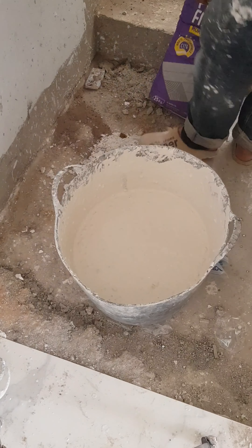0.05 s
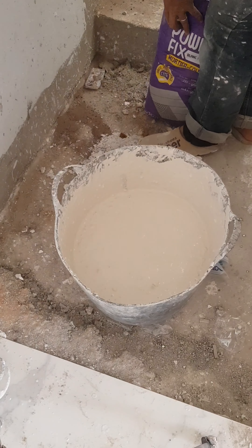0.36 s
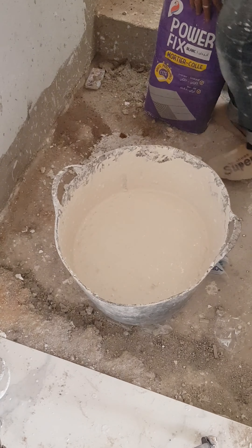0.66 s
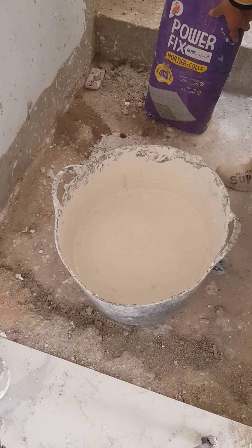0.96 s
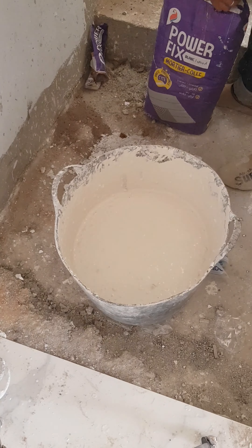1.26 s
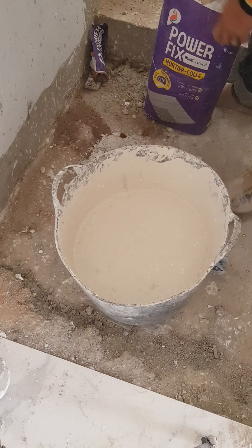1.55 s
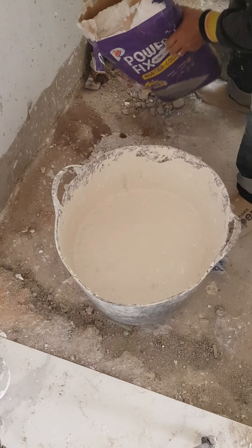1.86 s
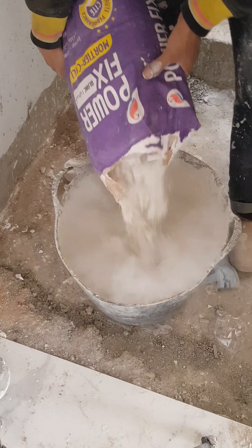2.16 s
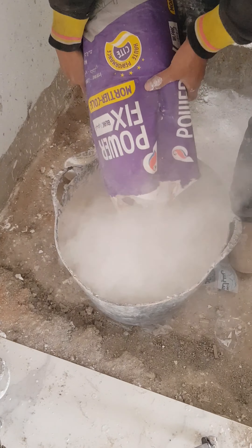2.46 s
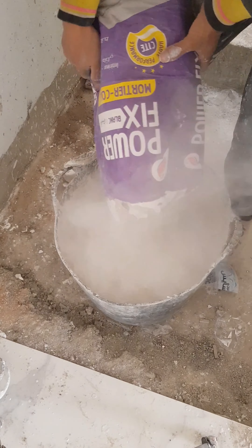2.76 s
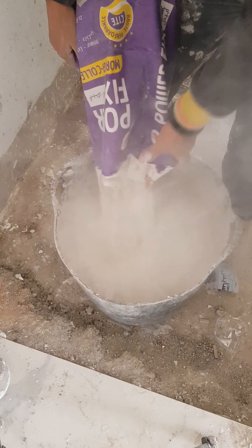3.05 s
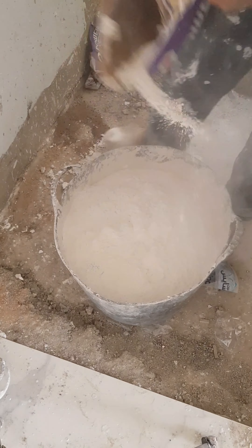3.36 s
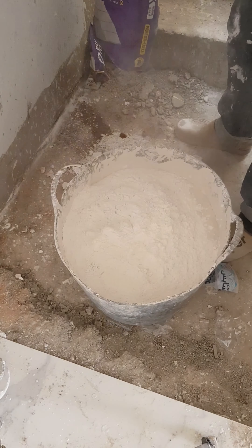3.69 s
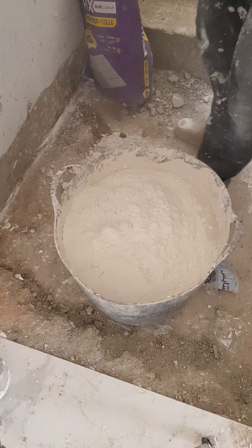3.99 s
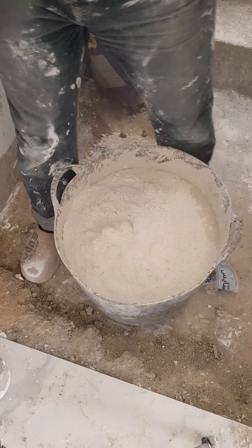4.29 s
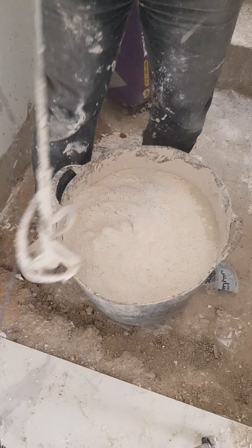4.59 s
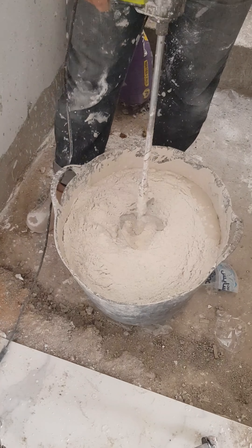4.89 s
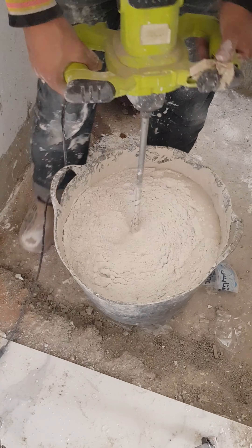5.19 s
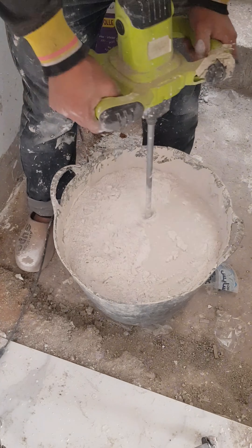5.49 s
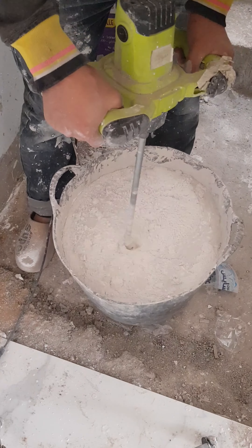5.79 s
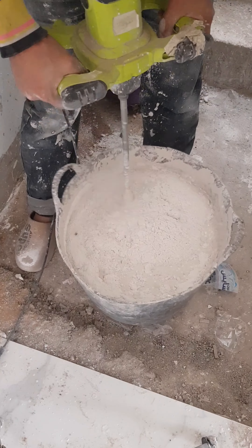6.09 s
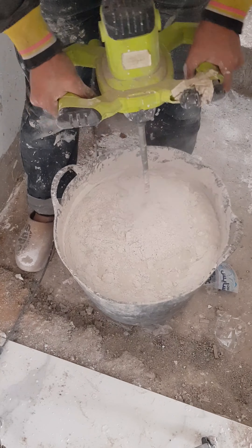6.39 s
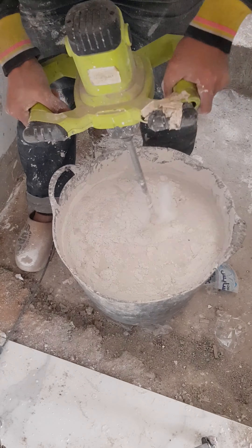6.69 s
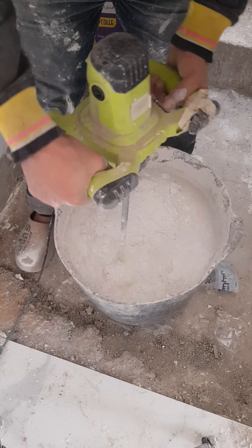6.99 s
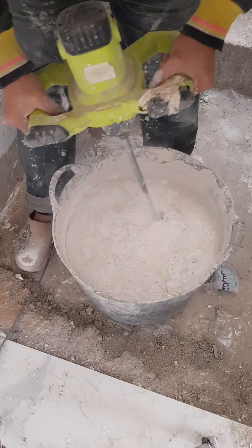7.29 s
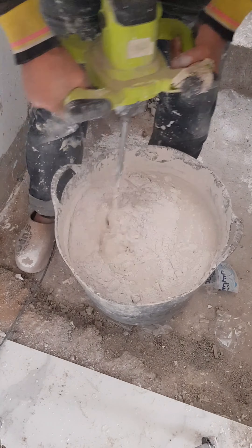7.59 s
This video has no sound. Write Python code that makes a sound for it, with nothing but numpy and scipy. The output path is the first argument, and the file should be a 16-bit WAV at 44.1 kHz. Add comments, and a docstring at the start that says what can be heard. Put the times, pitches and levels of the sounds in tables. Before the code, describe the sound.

Close by in a bare, slightly echoing room, someone handles a sack, with uneven rustling, crisp snaps, shuffling steps and a few dull bumps. This quietens, a switch clicks faintly, and a handheld electric mixer starts about five seconds in. It runs to the end with a loud, wavering gear whine and a rushing fan, over the low churn of mortar in a plastic tub.

```python
"""First comes the rustle of a sack and work clothes, rubbing and crinkling, with shuffling feet and soft
knocks on the floor and a plastic tub of mortar. After about five seconds a trigger clicks and a paddle
mixer spins up. Its gear teeth whine and rattle, and the pitch sags whenever the paddle bites.
The cooling fan rushes and the mortar churns against the tub. The bare room adds a short echo."""
import sys
import numpy as np
from scipy import signal
from scipy.fft import rfft, irfft, next_fast_len
from scipy.io import wavfile

SR = 44100
rng = np.random.default_rng(int(sys.argv[2]) if len(sys.argv) > 2 else 0)


def unload_wav(signal):
    """Save mono or channel-first audio to the path in sys.argv[1] as 16-bit WAV at rate SR, clipped to [-1, 1]."""
    wavfile.write(
        sys.argv[1],
        SR,
        np.round(np.clip(np.atleast_2d(signal).T, -1, 1) * 32767).astype(np.int16),
    )


N = 346179
TIME = np.arange(N) / SR
STEPS = TIME[::32]   # coarser times, for slow changes

# how fast the gear teeth meet, sagging when the paddle bites: (time [s], tooth rate [Hz])
TOOTH_RATE = [(5.27, 1254), (5.3, 1265), (5.33, 1727), (5.38, 1930), (5.43, 2103), (5.51, 2068),
              (5.66, 1757), (5.78, 2083), (6.01, 1843), (6.25, 1790), (6.33, 1697), (6.55, 1950),
              (6.88, 1766), (6.93, 1857), (7.03, 1890), (7.16, 1586), (7.23, 1733), (7.38, 1706),
              (7.6, 1858), (7.67, 1794), (7.83, 1895), (7.85, 1864)]
# the tones in the whine: (multiple of the tooth rate, level [dB])
WHINE_TONES = [(.25, -8.5), (0.678, -8.5), (1, 0), (2, 0), (3, -15), (4, -10.5), (5, -11), (6, -10),
               (6.999, -12), (8, -9)]
# how hard the teeth press, heard in the lower tones: (time [s], level [dB])
TOOTH_LOAD = [(5.27, -3.5), (5.35, 0.5), (5.5, 3.5), (5.68, -2), (5.85, 1.5), (6.05, 1), (6.3, 3.5),
              (6.37, -0.5), (6.46, 4.5), (6.97, -1.5), (7.05, 4), (7.13, 3), (7.85, -1.5)]
# how much the gears rasp, heard in the overtones: (time [s], level [dB])
RASP = [(5.4, 0), (5.9, 0), (6.2, 1), (6.55, 2), (6.95, -0.5), (7.15, -1.5), (7.25, 0.5), (7.55, -2.5),
        (7.73, 3)]
# the housing lets some pitches out better than others: (frequency [Hz], level [dB])
HOUSING = [(1120, -1), (1260, 3.5), (1400, -4), (1830, 0.5), (3200, -2), (3850, 1), (4200, 0.5),
           (5600, 5.5), (7400, 2), (8500, -1), (9500, 4), (10300, 0.5), (12000, -1.5), (13400, 7),
           (14300, -9)]
# where the gear case rings: (frequency [Hz], width [Hz], level [dB])
CASE_RINGS = [(1213, 220, 5.5), (1740, 860, -15), (2600, 190, -16), (3670, 570, -5)]
# the case squeals as the motor takes up slack: (time [s], level [dB], pitch [Hz], fade time [s])
SQUEALS = [(5.272, -34, 2490, 0.12), (5.295, -14, 2654, 0.056)]
# the mixer leans towards the listener and away: (time [s], level [dB])
NEARNESS = [(5.3, .5), (5.45, -0.1), (5.7, -1), (6.1, 0), (6.55, 0.2), (6.95, 0), (7.25, 0.6), (7.55, 0),
            (7.8, 0.9)]
# the trigger's click: (time [s], level [dB])
TRIGGER = [(5.1578, -26)]
# tone colours of the gear rattle, fan and mortar: (frequency [Hz], level [dB])
RATTLE_COLOUR = [(500, -22), (800, -3.5), (1100, -3), (1480, -6.5), (2200, -4.5), (3000, -2.5), (4000, -8),
                 (5000, -10)]
FAN_COLOUR = [(4000, 6), (5600, 1.5), (6500, -1), (7200, -0.5), (8100, -5), (9600, -1.5), (12000, -3),
              (13300, -1.5), (16000, -7.5)]
MORTAR_COLOUR = [(25, -13), (50, -11.5), (73, 2), (100, -4.5), (170, -8), (260, -6.5), (340, -0.5),
                 (450, 0.5), (560, -3.5), (800, -4.5)]

# light rubbing as the worker moves between strokes: (time [s], level [dB])
FIDGETING = [(0, -49.5), (.7, -51.5), (1.02, -61.5), (1.25, -53), (1.63, -59), (2.1, -48), (2.62, -49.5),
             (3.05, -44.5), (3.75, -47.5), (4.18, -73.5), (4.45, -59.5), (4.75, -63.5), (4.85, -70),
             (5.0, -69), (5.24, -63.5)]
# strokes of sack and clothes: (time [s], rise time [s], fade time [s], rub [dB], crinkle [dB])
STROKES = [(0.0, 0.027, 0.62, -46, -45.5), (.29, 0.01, 0.22, -45, -47), (0.383, 0.042, 0.59, -36.5, -32),
           (0.429, 0.033, 0.84, -34.5, -39.5), (.52, 0.031, 0.33, -40.5, -57),
           (0.789, 0.078, 0.088, -38.5, -38.5), (.74, 0.032, 0.2, -43.5, -50),
           (.935, 0.02, 0.093, -51, -47), (1.053, 0.017, 0.32, -43, -46), (1.12, 0.034, 0.58, -43.5, -44),
           (1.29, 0.048, 0.28, -43.5, -42.5), (1.402, 0.02, 0.15, -31, -33),
           (1.52, 0.021, 0.11, -47.5, -50), (1.895, 0.028, 0.9, -45, -51.5),
           (1.69, 0.014, 0.36, -48, -46.5), (1.78, 0.047, 0.09, -47.5, -46),
           (2.02, 0.066, 0.9, -39.5, -44.5), (2.2, 0.071, 0.12, -41.5, -44), (2.36, 0.057, .17, -34, -38.5),
           (2.71, 0.01, 0.18, -49, -57), (2.9, 0.11, 1, -37.5, -40.5), (3.06, 0.029, 0.405, -38, -47),
           (3.24, .08, 0.21, -37.5, -42), (3.41, 0.035, 0.086, -43, -41.5),
           (3.53, 0.077, 0.091, -44.5, -48), (3.655, 0.086, 0.454, -41, -46),
           (3.756, 0.024, 0.22, -33, -38), (4.007, 0.023, 0.27, -51, -62),
           (4.308, 0.015, 0.081, -40.5, -48), (4.378, 0.015, 0.17, -52, -49.5),
           (4.49, 0.027, 0.26, -51, -78), (4.7, 0.048, 0.14, -60, -64), (4.93, .02, 0.17, -51.5, -60),
           (5.04, 0.024, 0.21, -53, -58)]
# feet shuffle and the sack is dumped: (time [s], level [dB], fade time [s])
SHUFFLES = [(0.0, -42.5, 0.57), (.83, -46, 0.74), (1.23, -50, .8), (1.42, -47, 0.64), (1.55, -42, 0.32),
            (1.81, -47, .3), (1.93, -42.5, 0.94), (2.11, -36.5, 1.2), (2.39, -35.5, 0.45),
            (2.52, -41.5, 0.53), (2.7, -42, 2), (2.96, -37.5, 1.6), (3.29, -39, 0.91), (3.76, -37, 0.72),
            (4.39, -40.5, 0.49), (4.63, -49, .12), (4.705, -46.5, 0.42), (4.88, -46.5, 0.4),
            (4.99, -50.5, .35), (5.16, -64, 0.99), (5.25, -44, 0.55)]
# sack, boots and paddle bump floor and tub: (time [s], level [dB], pitch [Hz], fade time [s])
KNOCKS = [(0.651, -27, 514, 0.026), (1.066, -43, 830, 0.06), (1.413, -33, 940, 0.23),
          (1.443, -30, 190, 0.12), (1.945, -28, 140, 0.069), (2.131, -15.5, 126, 0.035),
          (2.16, -30, 72, 0.74), (2.415, -24, 275, 0.068), (2.682, -34, 596, 0.06),
          (2.807, -35, 540, 0.046), (2.978, -12.5, 584, 0.016), (3.085, -26, 1130, 0.062),
          (3.312, -28, 507, 0.077), (3.441, -31, 605, 0.047), (3.778, -22.5, 468, 0.13),
          (3.785, -27.5, 240, 0.15), (3.795, -33, 79, 0.55), (4.407, -29.5, 243, 0.14),
          (4.648, -29, 520, 0.032), (4.903, -34, 673, 0.042)]
# creases snap and grit ticks: (time [s], level [dB])
SNAPS = [(0.0772, -27.5), (0.3012, -34.5), (0.393, -37), (1.0655, -46), (1.3094, -32), (1.3743, -29),
         (1.4147, -22), (1.696, -35.5), (1.8108, -33.5), (1.9021, -32), (2.1261, -26.5), (2.218, -42),
         (2.2458, -34), (2.4164, -24), (2.6818, -33), (2.8065, -32.5), (2.9776, -24), (3.1911, -29.5),
         (3.3717, -31), (3.4401, -31), (3.5872, -31), (5.0968, -36)]
# tone colours of the sack's dull rub and crisp crinkle: (frequency [Hz], level [dB])
SACK_COLOUR = [(35, -12), (72, -2), (100, -5.5), (140, -2.5), (200, -7.5), (280, -8.5), (450, -4.5),
               (650, -5.5), (900, -8), (1300, -8.5), (1900, -12), (2600, -15)]
CRINKLE_COLOUR = [(1180, -33), (2000, 0.5), (4340, -4), (7910, -8.5), (10100, -8.5), (12100, -4.5),
                  (15100, -8.5), (16000, -9)]
# tone colours of the room's reflections and faint rumble: (frequency [Hz], level [dB])
ROOM_COLOUR = [(60, 17), (250, -2.5), (1000, 0), (3000, 9.5), (14000, 6)]
RUMBLE_COLOUR = [(30, 13), (70, 21), (200, 7), (500, -15), (1500, -38), (4000, -30), (16000, -46)]

CUTOFF_HZ = 15900


def gear_whine(level_db=1.5):
    """Meeting teeth sing. Play between them and an off-centre wheel make the tones waver and throb."""
    lower = running(-35, db_per_octave=3.7, surge_db=3.7) * per_sample(from_db(curve(TOOTH_LOAD)))
    upper = running(-35, db_per_octave=11, surge_db=4.3) * per_sample(from_db(curve(RASP)))
    tooth_hz, wobble = gear_motion()
    waver = 1 + .009 * drift(90) + .012 * drift(400) + .005 * wobble
    phase = 2 * np.pi * np.cumsum(tooth_hz * waver) / SR
    tones = 0
    for multiple, db in WHINE_TONES:
        let_out = per_sample(from_db(db) * gain_at(HOUSING, multiple * curve(TOOTH_RATE)))
        tones += (lower if multiple < 1.5 else upper) * let_out * np.sin(multiple * phase)
    return tones * from_db(level_db + 2 * wobble + 2.5 * drift(80))


def rattle_and_fan(rattle_db=-1.5, case_db=-11.5, throb_db=0.8, grit=0.4):
    """Gears rattle and ring their case while the fan hisses; all throb with the big wheel."""
    gear_gain = running(-30, db_per_octave=13.5, surge_db=7)
    fan_gain = running(-33.5, db_per_octave=12, surge_db=6)
    _, wobble = gear_motion()
    throb = from_db(throb_db * wobble + drift(70))
    chatter = (rng.standard_normal(N) + grit * grains(1500, 3.4)) * throb
    case = rms_one(sum(from_db(db) * resonate(chatter, hz, width) for hz, width, db in CASE_RINGS))
    rattle = rms_one(band(colour(rng.standard_normal(N) * throb, RATTLE_COLOUR), 710, 4700))
    air = rms_one(band(colour(chatter, FAN_COLOUR), 4800, 18800))
    return gear_gain * (from_db(case_db) * case + from_db(rattle_db) * rattle) + fan_gain * air


def mortar_churn(plunge_s=5.94, shallow_db=-7, boom_hz=110, lumps_db=1.16):
    """Lumpy mortar swirls against the tub, which booms more once the paddle is deep."""
    swirl = rms_one(band(colour(rng.standard_normal(N), MORTAR_COLOUR), 21.8, 810))
    boom = signal.sosfiltfilt(signal.butter(3, boom_hz, fs=SR, output="sos"), swirl)
    boom_gain = from_db(shallow_db * (1 - np.tanh(10 * (TIME - plunge_s))) / 2)
    lumps = from_db(lumps_db * drift(9.5))
    return running(-33, db_per_octave=12, surge_db=1) * (swirl + (boom_gain - 1) * boom) * lumps


def gear_motion(teeth=40):
    """The tooth rate, and the big wheel's lopsided wobble on each turn."""
    tooth_hz = per_sample(curve(TOOTH_RATE))
    angle = 2 * np.pi * np.cumsum(tooth_hz / teeth) / SR
    return tooth_hz, np.cos(angle) + .4 * np.cos(2 * angle)


def running(db, db_per_octave, surge_db, start_s=5.27, rise_s=0.0076, surge_s=0.081, usual_hz=1876):
    """Loudness of a mixer part: it surges at switch-on, then follows speed and nearness."""
    age = STEPS - start_s
    speed_db = db_per_octave * np.log2(curve(TOOTH_RATE) / usual_hz)
    surge = np.exp(-np.maximum(age, 0) / surge_s)
    switched_on = (1 + np.tanh(age / rise_s)) / 2
    return per_sample(from_db(db + speed_db + surge_db * surge + curve(NEARNESS)) * switched_on)


def rustle(clumps, strengths, crackle=0.61, flutter_db=3.5):
    """Sack and cloth slip in clumps of tiny catches, over dull flapping and shuffling."""
    rub, crinkle, flap = strengths
    friction = (rng.standard_normal(N) + crackle * grains(1400, 3.5)) * clumps
    low = band(colour(rng.standard_normal(N), SACK_COLOUR), 22, 333) * from_db(flutter_db * drift(25))
    body = band(colour(friction, SACK_COLOUR), 278, 2300)
    crisp = band(colour(friction, CRINKLE_COLOUR), 2430, 26000)
    return flap * rms_one(low) + rub * rms_one(body) + crinkle * rms_one(crisp)


def movements(crinkle_share_db=-5, flap_share_db=-6.5):
    """How strongly the worker's moves rub, crinkle and flap. Overlapping moves add in power."""
    fidget = from_db(curve(FIDGETING))
    rub, crinkle = fidget ** 2, (fidget * from_db(crinkle_share_db)) ** 2
    for start_s, rise_s, fade_s, rub_db, crinkle_db in STROKES:
        stroke = swell(start_s, fade_s, rise_s)
        rub += (from_db(rub_db) * stroke) ** 2
        crinkle += (from_db(crinkle_db) * stroke) ** 2
    flap = rub * from_db(flap_share_db) ** 2
    for start_s, db, fade_s in SHUFFLES:
        flap += (from_db(db) * swell(start_s, fade_s, rise_s=0.019)) ** 2
    return [per_sample(np.sqrt(power)) for power in (rub, crinkle, flap)]


def swell(start_s, fade_s, rise_s, round_s=0.0055):
    """One move gathers pace, rounds off and dies away. A fade time is the time to drop 60 dB."""
    age = np.maximum(STEPS - start_s, 0)
    past_peak = np.maximum(age - rise_s, 0)
    fading = np.hypot(past_peak, round_s) - round_s
    return np.minimum(age / rise_s, 1) * from_db(-60 * fading / fade_s)


def knocks(rows, damping, rise_s):
    """Each blow rings at one pitch: a thud with high damping, a squeal with low."""
    out = np.zeros(N)
    for start_s, db, hz, fade_s in rows:
        where, noise, shape = burst(start_s, fade_s, rise_s)
        ring = resonate(resonate(noise, hz, damping * hz), hz, 2 * hz)
        out[where] += from_db(db) * rms_one(ring) * np.sqrt(np.mean(shape ** 2))
    return out


def clicks(rows, rise_s, fade_s, low_hz):
    """A crease, bit of grit or switch snaps with a short, bright burst of noise."""
    out = np.zeros(N)
    for start_s, db in rows:
        where, noise, _ = burst(start_s, fade_s, rise_s)
        out[where] += from_db(db) * noise
    return band(out, low_hz, 14700, order=1)


def handling(clumps, strengths):
    """All the worker's own sounds: rustles, bumps, snaps and the trigger."""
    return (rustle(clumps, strengths)
            + knocks(KNOCKS, damping=0.16, rise_s=0.0026)
            + from_db(-1.5) * clicks(SNAPS, rise_s=0.0005, fade_s=0.022, low_hz=700)
            + clicks(TRIGGER, rise_s=0.0002, fade_s=0.01, low_hz=8400))


def stereo(source, lag_ms, scatter_db, lean_db, spacing_m=0.189):
    """Direct sound reaches the left first; sound scattered by the room matches only in the bass."""
    size = next_fast_len(N + 1024)
    hz = np.fft.rfftfreq(size, 1 / SR)
    # the same events three times, each with fresh noise
    direct, shared, apart = rfft(np.array([source() for _ in range(3)]), size)
    sides = np.array([[1], [-1]])   # left, right
    alike = np.sinc(2 * hz * spacing_m / 343)   # sound travels at 343 m/s
    scattered = np.sqrt((1 + alike) / 2) * shared + np.sqrt((1 - alike) / 2) * apart * sides
    amount = from_db(scatter_db) * gain_at(ROOM_COLOUR, hz)
    delay = np.exp(-2j * np.pi * hz * np.array([[0], [lag_ms / 1000]]))
    blend = (direct * delay + amount * scattered) / np.sqrt(1 + amount ** 2)
    # the microphones lift the treble, the left one a little more
    treble_db = 2.54 * hz ** 2 / (hz ** 2 + 600 ** 2) + lean_db * sides * np.sqrt(hz / CUTOFF_HZ)
    return irfft(from_db(treble_db) * blend, size)[:, :N]


def room_echo(x, echo_db=-12, early_fade_s=0.051, late_fade_s=0.29, late_db=-6.5):
    """The bare walls add a short, dull tail."""
    age = np.arange(SR // 2) / SR
    noise = band(rng.standard_normal((2, len(age))), 270, 3500, order=1)
    fade = (from_db(-60 * age / early_fade_s) + from_db(late_db - 60 * age / late_fade_s)) * (age > .006)
    tail = noise * fade / np.linalg.norm(fade)
    return x + from_db(echo_db) * signal.fftconvolve(x, tail, axes=1)[:, :N]


def room_rumble(level_db=-72):
    """Faint, low noise on each side."""
    sides = [rms_one(colour(rng.standard_normal(N), RUMBLE_COLOUR)) for _ in range(2)]
    return from_db(level_db) * np.array(sides)


def burst(start_s, fade_s, rise_s):
    """A rough contact: its place in time, its fading noise and its outline."""
    age = np.arange(SR // 2) / SR
    shape = from_db(-60 * age / fade_s) * (1 - np.exp(-age / rise_s))
    first = round(start_s * SR)
    return slice(first, first + len(age)), shape * rng.standard_normal(len(age)), shape


def grains(per_s, spread_db):
    """Random clicks of uneven size, with an average power of 1."""
    chance, out = rng.random(N) * SR / per_s, np.zeros(N)
    hits = chance < 1
    sizes = from_db(spread_db * np.minimum(-np.log(chance[hits] + 1e-12), 5))
    out[hits] = sizes * (-1) ** np.arange(len(sizes))
    return rms_one(out)


def drift(rate_hz):
    """A smooth random wander, about 1 in size."""
    r = np.exp(-40 * np.pi * rate_hz / SR)
    slow = signal.lfilter([1], [1, -2 * r, r * r], rng.standard_normal(N // 20 + 4002))[4000:]
    return np.interp(np.arange(N) / 20, np.arange(len(slow)), rms_one(slow))


def resonate(x, hz, width_hz):
    """Make a sound ring around one pitch."""
    r = np.exp(-np.pi * width_hz / SR)
    feedback = [1, -2 * r * np.cos(2 * np.pi * hz / SR), r * r]
    return signal.lfilter(np.array([1, 0, -1]) * (1 - r * r) / 2, feedback, x)


def band(x, low_hz, high_hz, order=3):
    """Keep what lies between two frequencies."""
    edges = [low_hz, min(high_hz, .45 * SR)]
    return signal.sosfilt(signal.butter(order, edges, "band", fs=SR, output="sos"), x + 1e-18)


def colour(x, points):
    """Give a sound a tone colour."""
    size = next_fast_len(N)
    return irfft(rfft(x, size) * gain_at(points, np.fft.rfftfreq(size, 1 / SR)), size)[:N]


def gain_at(points, hz):
    """Look up a tone colour's gain at any frequency."""
    table_hz, db = np.transpose(points)
    return from_db(np.interp(np.log(hz + 1), np.log(table_hz), db))


def curve(rows):
    """Join (time, value) points with straight lines."""
    return np.interp(STEPS, *np.transpose(rows))


def per_sample(slow):
    """Fill in a slow curve for every sample."""
    return np.interp(TIME, STEPS, slow)


def from_db(db):
    """Turn decibels into a gain to multiply by."""
    return 10 ** (np.asarray(db) / 20)


def rms_one(x):
    """Scale to an average power of 1."""
    return x / np.sqrt(np.mean(x ** 2) + 1e-20)


def scene(clump_db=2.5):
    """The worker first, then the mixer, over the room's faint rumble."""
    def mixer():
        """All the parts of the running mixer."""
        body = rattle_and_fan() + mortar_churn() + gear_whine()
        return body + knocks(SQUEALS, damping=0.021, rise_s=0.0029)

    clumps, strengths = from_db(clump_db * drift(40)), movements()
    worker = stereo(lambda: handling(clumps, strengths), lag_ms=0.21, scatter_db=3.0, lean_db=0.9)
    machine = stereo(mixer, lag_ms=0.18, scatter_db=0.0, lean_db=1.0)
    return room_echo(worker + machine) + room_rumble()


def record(dry):
    """Cut off the highest treble steeply."""
    return signal.sosfilt(signal.ellip(10, .2, 80, CUTOFF_HZ, fs=SR, output="sos"), dry)


dry = scene()
out = record(dry)
unload_wav(out)
```